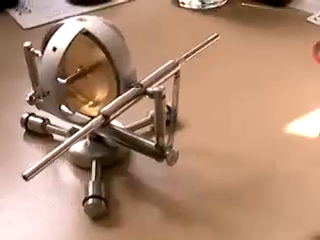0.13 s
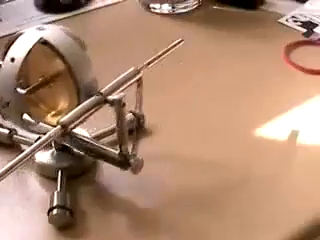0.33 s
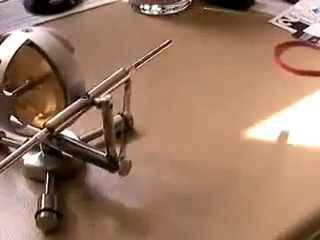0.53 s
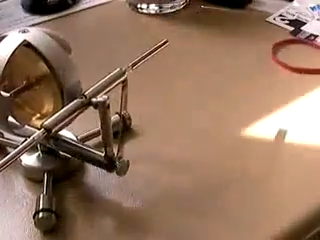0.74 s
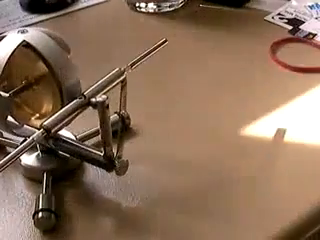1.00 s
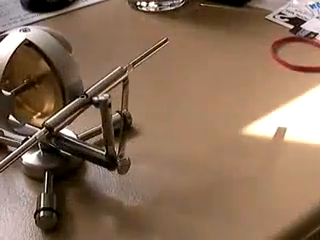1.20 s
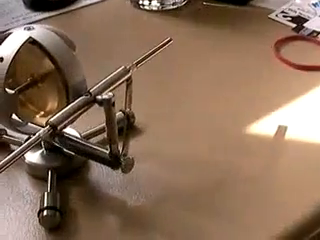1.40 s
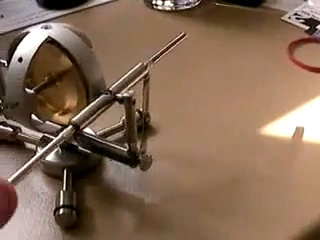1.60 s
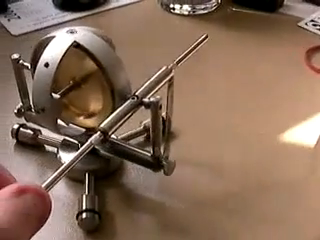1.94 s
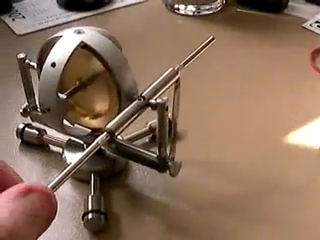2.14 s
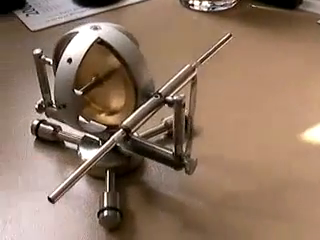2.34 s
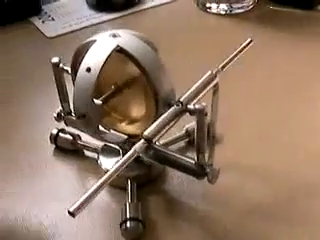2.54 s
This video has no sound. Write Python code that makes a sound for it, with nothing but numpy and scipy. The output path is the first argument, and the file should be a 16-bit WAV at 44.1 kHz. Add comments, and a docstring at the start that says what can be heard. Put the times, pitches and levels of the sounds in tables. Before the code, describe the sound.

A spinning gyroscope rotor hums at a low, nearly constant pitch, sinking very slightly, with a bright, grainy metallic bearing whir above. The sound rises abruptly in two steps by 0.3 s, with a dry tick near 0.2. Faint hollow knocks cluster from 0.2 to 1.15 s, then scatter from 1.75 to 2.5. Soft low bumps come near 1.4, 1.7 and 2.2 over quiet room rumble and hiss.

```python
"""A gyroscope's brass rotor spins on a desk, slowing slightly.
Its imbalance hums once a turn, while random ball contacts whir through the resonances of the metal.
Faint hollow handling knocks, three soft low bumps and one dry tick sound over the room's rumble,
hiss and two weak tones. At the start the level rises in two steps."""
import sys
import numpy as np
from scipy.fft import rfft, irfft, next_fast_len
from scipy.io import wavfile
from scipy.ndimage import map_coordinates

SR = 44100
rng = np.random.default_rng(int(sys.argv[2]) if len(sys.argv) > 2 else 0)


def master(y):
    """Save y as 16-bit WAV."""
    cut = np.clip(np.atleast_2d(y).T, -1, 1)
    pcm = np.round(cut * 32767)  # scale
    wavfile.write(sys.argv[1], SR, pcm.astype(np.int16))


N = 117306

# left-right correlation of the hiss and the tick: frequency_hz, correlation
HISS_CORRELATION = [(400, -0.65), (1200, -0.16), (2500, -0.19), (4500, 0.15), (9000, -0.2)]


def amp(db):
    """Gain from decibels: 20 dB is a factor of ten in amplitude."""
    return 10 ** (np.asarray(db) / 20)


def unit(x):
    """Normalise the mean power to one, so that a later gain sets the rms level."""
    return x / np.sqrt(np.mean(x ** 2) + 1e-20)


def along(points, hz):
    """Interpolate (frequency, value) points on a logarithmic frequency axis."""
    f, v = np.transpose(points)
    return np.interp(np.log(hz + 1), np.log(f + 1), v)


def curves(rows):
    """Interpolate linearly in time: one value per sample for each column after time_s."""
    s, *columns = np.transpose(rows)
    t = np.arange(N) / SR
    return [np.interp(t, s, column) for column in columns]


def wobble(rate):
    """Slow random modulation: a spline through Gaussian knots, rate knots a second."""
    knots = rng.standard_normal(2048)
    return map_coordinates(knots, [np.arange(N) * rate / SR], mode="mirror")


def filtered(x, response):
    """Linear filtering: multiply the zero-padded spectrum by a response of frequency."""
    m = next_fast_len(N + SR // 2)
    spectrum = rfft(x, m) * response(np.fft.rfftfreq(m, 1 / SR))
    return irfft(spectrum, m)[..., :N]


def noise(spectrum, correlation):
    """Coloured stereo noise of rms 1: the mid-side power ratio fixes the left-right correlation."""
    def mid_side_response(hz):
        angle = np.arccos(np.clip(along(correlation, hz), -1, 1)) / 2
        return amp(along(spectrum, hz)) * np.array([np.cos(angle), np.sin(angle)])

    mid, side = filtered(rng.standard_normal((2, N)), mid_side_response)
    return unit(np.array([mid + side, mid - side]))


def hum(angle):
    """Forced vibration: the rotor's imbalance shakes stand and desk once a turn, with a weak overtone."""
    # rms level of the hum: time_s, once_a_turn_db, twice_a_turn_db
    harmonic_levels = [(.1, -31.5, -49.5), (.35, -35.5, -51.5), (.55, -31.5, -48), (.9, -28.5, -52.5),
                       (1.3, -29, -45.5), (1.7, -28, -47), (2.1, -28.5, -63.5), (2.66, -30, -65)]
    waver_db, waver_knots_per_s = 0.88, 18
    pan_db = -.5  # added on the left, subtracted on the right

    tone = np.zeros(N)
    for order, level_db in enumerate(curves(harmonic_levels), start=1):
        gain = amp(level_db + waver_db * wobble(waver_knots_per_s))
        tone += gain * np.sin(order * angle)
    return np.sqrt(2) * tone * amp([[pan_db], [-pan_db]])


def ringing_metal(angle, modes, level_db, correlation):
    """Resonance under random impacts: ball contacts ring each mode, modulated once a turn."""
    # stereo balance: frequency_hz, left_minus_right_db
    balance = [(2500, -6), (5000, -0.5), (10000, .6)]
    contacts_per_s, contact_scatter_db = 4000, 2
    mode_waver_db, mode_waver_knots_per_s = 1, 13
    flutter_db, flutter_knots_per_s = 1.1, 80
    turn_depth = 0.075  # fraction of the amplitude

    metal = np.zeros((2, N))
    for hz, width, db in modes:
        happens = rng.random((2, N)) < contacts_per_s / SR
        contacts = happens * rng.choice([-1, 1], (2, N))
        contacts = contacts * amp(contact_scatter_db * rng.standard_normal((2, N)))
        # two equal resonators in cascade
        ring = filtered(contacts, lambda f: (1j * f * width / (hz * hz - f * f + 1j * f * width)) ** 2)
        metal += amp(db + mode_waver_db * wobble(mode_waver_knots_per_s)) * ring

    load = amp(flutter_db * wobble(flutter_knots_per_s)) * (1 + turn_depth * np.sin(angle))
    mix_angle = np.arccos(np.clip(correlation, -1, 1)) / 2
    mid, side = np.cos(mix_angle) * metal[0], np.sin(mix_angle) * metal[1]
    stereo = np.array([mid + side, mid - side])
    placed = filtered(stereo, lambda hz: amp(along(balance, hz) * np.array([[.5], [-.5]])))
    return amp(level_db) * unit(load * placed)


def whir(angle):
    """Modal superposition: stand, frame and bearings each sound in their own band of resonances."""
    # level of each part: time_s, stand_db, frame_db, bearings_db
    part_levels = [(.1, -55, -40, -39), (.33, -61.5, -42.5, -42), (.6, -53, -42.5, -38.5),
                   (1.05, -52.5, -42.5, -38.5), (1.3, -53, -41.5, -38.5), (1.5, -48.5, -41, -39),
                   (1.85, -53.5, -38, -39.5), (2.25, -49.5, -39.5, -38), (2.66, -50, -37.5, -38)]
    # low resonances of the stand: frequency_hz, single_resonator_width_hz, relative_level_db
    stand_modes = [(1865, 74, -5.5), (2072, 74, -8.5), (2777, 125, -1.5), (3414, 93, -2), (3660, 42, 0.5)]
    # middle resonances of the frame: frequency_hz, single_resonator_width_hz, relative_level_db
    frame_modes = [(4950, 384, -7.5), (5185, 286, 1), (5466, 184, -5.5), (6264, 112, -3.5),
                   (6450, 190, -11.5), (6935, 67, -10.5), (7300, 260, -19.5)]
    # high resonances of the bearings: frequency_hz, single_resonator_width_hz, relative_level_db
    bearing_modes = [(9976, 910, -8), (10364, 270, 0), (10880, 340, -1), (11400, 760, -7),
                     (11890, 240, -5.5), (12600, 470, -6.5), (13140, 310, -22), (13270, 270, -5),
                     (13410, 130, -1)]

    stand_db, frame_db, bearings_db = curves(part_levels)
    stand = ringing_metal(angle, stand_modes, stand_db, correlation=0.84)
    frame = ringing_metal(angle, frame_modes, frame_db, correlation=0.97)
    bearings = ringing_metal(angle, bearing_modes, bearings_db, correlation=0.85)
    return stand + frame + bearings


def knocks():
    """Damped free vibration: light handling knocks thud and ring a small hollow shell.

    The ring has opposite polarity in the two channels."""
    # the knocks: start_s, gain_db
    knock_times = [(.184, -30.5), (.283, -40), (.386, -30.5), (.549, -39), (.583, -39), (.647, -39.5),
                   (.683, -36), (.748, -31.5), (.783, -38), (.850, -32.5), (.883, -27.5), (.953, -33),
                   (.983, -33), (1.084, -34.5), (1.149, -36.5), (1.752, -29), (1.810, -35.5), (1.946, -39),
                   (2.154, -38), (2.318, -31), (2.518, -30.5)]
    # modes of the shell: frequency_hz, relative_level_db, t60_s
    shell_modes = [(640, -19, 0.01), (799, 5.5, 0.03), (848, 2.5, 0.08), (1810, 2, 0.017)]
    # colour of the dull thud under each knock: frequency_hz, relative_density_db
    thud_spectrum = [(150, -14), (350, 7.5), (650, 5.5), (1000, -4), (2000, -2), (5000, -33)]
    attack_s, left_db = 0.0038, -6
    level_scatter_db, pitch_scatter = 1.5, 0.012  # pitch as a fraction
    thud_db, thud_t60_s, thud_correlation = -11, 0.072, -0.18

    t = np.arange(SR // 8) / SR
    shell, thud_envelope = np.zeros(N + SR), np.zeros(N + SR)
    for start_s, db in knock_times:
        ring = np.zeros(len(t))
        for hz, level_db, t60_s in shell_modes:
            decay = amp(level_db + rng.normal(0, level_scatter_db) - 60 * t / t60_s)
            ring += decay * np.sin(2 * np.pi * hz * rng.normal(1, pitch_scatter) * t)
        start = round(start_s * SR)
        shell[start:][:len(t)] += amp(db) * ring * (1 - np.exp(-t / attack_s))
        thud_envelope[start:][:len(t)] += amp(db + thud_db - 60 * t / thud_t60_s)

    ringing = np.array([-amp(left_db) * shell[:N], shell[:N]])
    return ringing + thud_envelope[:N] * noise(thud_spectrum, [(1, thud_correlation)])


def bumps():
    """Windowed oscillation: a few cycles of dull bass under a sine-squared swell."""
    # soft low bumps: start_s, peak_level_db
    bump_times = [(1.39, -36), (1.709, -43), (2.22, -33)]
    pitch_hz, length_s = 84.5, .05

    t = np.arange(N) / SR
    out = np.zeros(N)
    for start_s, db in bump_times:
        swell = np.sin(np.pi * np.clip((t - start_s) / length_s, 0, 1)) ** 2
        out += amp(db) * swell * np.sin(2 * np.pi * pitch_hz * (t - start_s))
    return out


def tick():
    """Exponential decay of broadband noise: a brief dry burst without any ring."""
    # colour of the tick: frequency_hz, relative_density_db
    tick_spectrum = [(400, -17), (1100, 0), (2600, 2), (4200, 4), (6500, -5), (13000, -14)]
    start_s, start_db, t60_s = .182, -35, .09

    t = np.arange(N) / SR - start_s
    envelope = (t > 0) * amp(start_db - 60 * np.abs(t) / t60_s)
    return envelope * noise(tick_spectrum, HISS_CORRELATION)


def room():
    """Stationary and modulated noise: even hiss and unsteady rumble, with two weak tones."""
    # rumble level: time_s, level_db
    rumble_levels = [(.1, -38), (.4, -43.5), (.75, -40.5), (1.0, -43), (1.25, -38.5), (1.6, -39.5),
                     (1.74, -38), (1.95, -39.5), (2.25, -39), (2.4, -39.5), (2.66, -40)]
    # rumble colour: frequency_hz, relative_density_db
    rumble_spectrum = [(20, -18), (50, -17), (100, -1), (140, -0.5), (180, -3), (270, -4), (300, -8),
                       (350, -23), (500, -23), (1500, -55)]
    # left-right correlation of the rumble: frequency_hz, correlation
    rumble_correlation = [(25, 0.36), (60, .8), (100, 0.42), (140, 0.6), (250, 0), (400, 0)]
    # hiss colour: frequency_hz, relative_density_db
    hiss_spectrum = [(100, -28), (400, -3.5), (1000, 4), (2000, 1.5), (4300, -1), (5900, -4.5),
                     (9000, -7.5), (13500, -5.5)]
    # weak tones, the lower beating against the hum: frequency_hz, rms_level_db
    weak_tones = [(121, -46.5), (433, -68)]
    rumble_waver_db, tone_waver_db = 1.8, 0.67
    hiss_db, hiss_pan_db = -44, 0.13  # pan added on the left, subtracted on the right

    t = np.arange(N) / SR
    rumble_gain = amp(curves(rumble_levels)[0] + rumble_waver_db * wobble(8.73))
    rumble = rumble_gain * noise(rumble_spectrum, rumble_correlation)
    tones = np.zeros(N)
    for hz, db in weak_tones:
        gain = np.sqrt(2) * amp(db + tone_waver_db * wobble(2.48))
        tones += gain * np.sin(2 * np.pi * (hz * t + rng.random()))
    hiss_gain = amp(hiss_db) * amp([[hiss_pan_db], [-hiss_pan_db]])
    return rumble + tones + hiss_gain * noise(hiss_spectrum, HISS_CORRELATION)


def scene():
    """Superposition: one rotation angle drives both hum and whir, and the other sounds add to them."""
    # rotor speed: time_s, turns_per_s
    rotor_speed = [(0, 135.5), (.9, 134.4), (1.55, 133.7), (2.1, 133.3), (2.66, 132.9)]

    angle = 2 * np.pi * np.cumsum(curves(rotor_speed)[0]) / SR
    rotor = hum(angle) + whir(angle)
    return rotor + knocks() + bumps() + tick() + room()


def record(dry):
    """Linear response and gain: overall tone colour, a rise in two steps, then an upper band limit."""
    # tone curve of the whole sound, with a deep dip near 8 kHz: frequency_hz, gain_db
    tone_curve = [(6900, 1), (7400, -1), (7700, -39), (8250, -37), (8600, 7), (9500, 1)]
    # opening rise in two steps, then a constant gain: time_s, gain_db
    opening = [(.078, -64.5), (.086, -12.5), (.17, -10.5), (.182, -6), (.3, -2)]
    top_hz, slope_hz = 13700, 200  # silent above top_hz, falling to it over slope_hz

    coloured = filtered(dry, lambda hz: amp(along(tone_curve, hz)))
    opened = coloured * amp(curves(opening)[0])
    return filtered(opened, lambda hz: np.clip((top_hz - hz) / slope_hz, 0, 1))


dry = scene()
out = record(dry)
master(out)
```